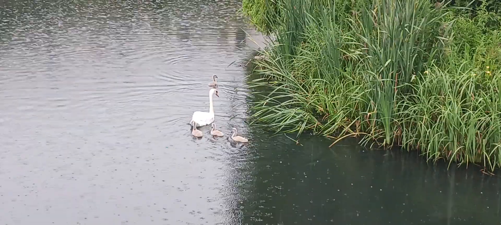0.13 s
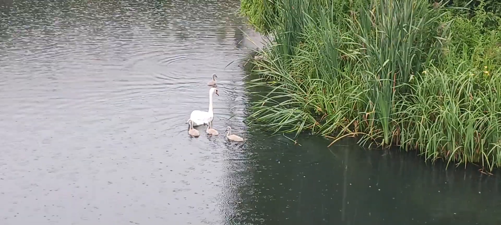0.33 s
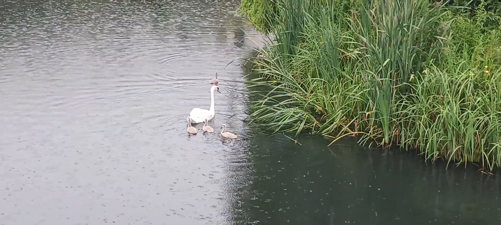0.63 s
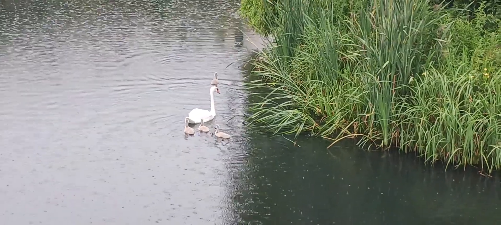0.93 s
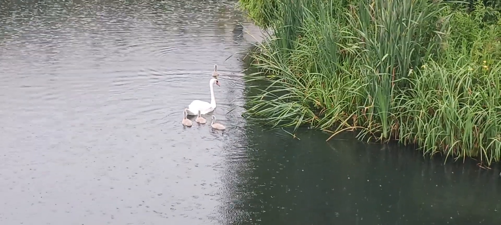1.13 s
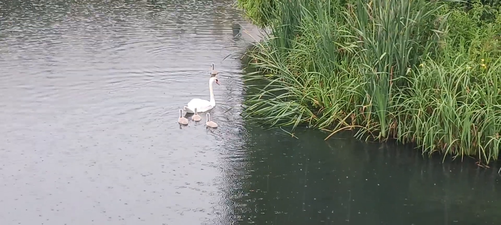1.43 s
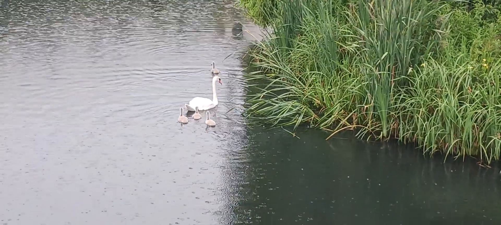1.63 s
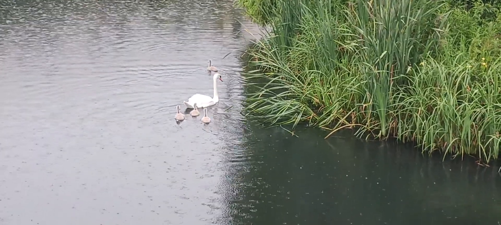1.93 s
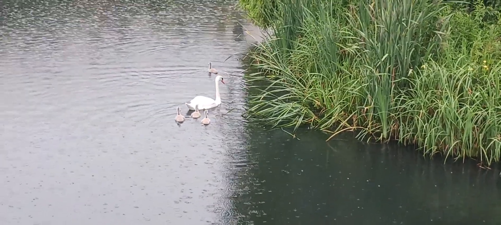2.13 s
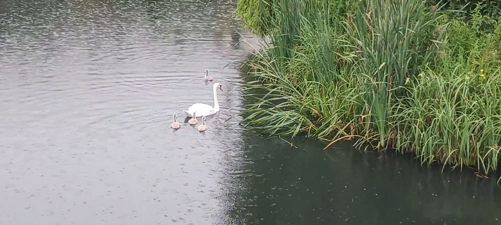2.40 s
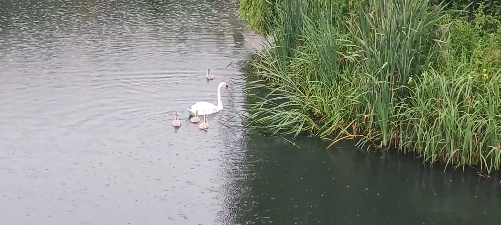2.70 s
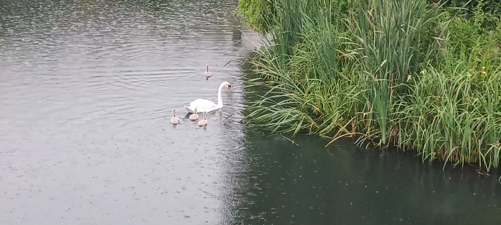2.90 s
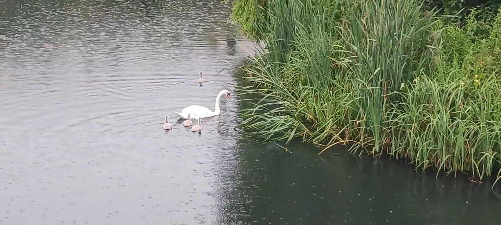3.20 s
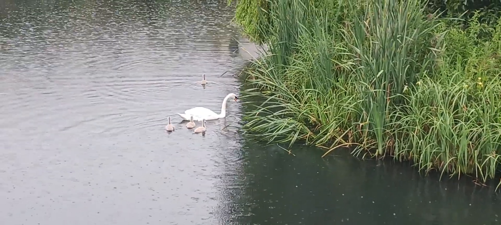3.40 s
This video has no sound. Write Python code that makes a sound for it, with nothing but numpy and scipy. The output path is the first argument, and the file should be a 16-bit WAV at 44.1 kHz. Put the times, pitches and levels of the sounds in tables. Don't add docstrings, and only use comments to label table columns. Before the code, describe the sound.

Silence for 0.1 s, then steady fine rain on a pond and reeds fades in fast and continues to 3.5 s, bright left, muffled right, over low uneven gusts and a faint distant hum. From 0.4 s single drops tick sharply, plop on water and tap leaves, mostly left. Small case knocks start around 1 s, clustering at 1.9, 2.6 and 3.3 s with finger creaks; a faint high sleeve swish passes at 2.9-3.2 s.

```python
import sys
import numpy as np
from scipy import signal
from scipy.fft import rfft, irfft
from scipy.io import wavfile
from scipy.ndimage import uniform_filter1d

SR = 44100
rng = np.random.default_rng(int(sys.argv[2]) if len(sys.argv) > 2 else 0)


def decibels_to_gain(level_db):
    exponent = np.asarray(level_db, float) / 20
    return 10 ** exponent


def transcribe(u):
    v = np.clip(np.atleast_2d(u).T, -1, 1)
    q = np.round(v * 32767).astype(np.int16)
    wavfile.write(sys.argv[1], SR, q)


N = 156555


def evened(x):
    return x / np.sqrt(np.mean(x ** 2) + 1e-20)


def read(points, hz):
    f, value = np.transpose(points)
    return np.interp(np.log(hz + 1), np.log(f + 1), value)


def along(points):
    return np.interp(np.arange(N) / SR, *np.transpose(points))


def shape(x, gain):
    return irfft(rfft(x) * gain(np.fft.rfftfreq(N, 1 / SR)), N)


def add(mix, start_s, sound):
    part = mix[:, round(start_s * SR):][:, :sound.shape[1]]
    part += sound[:, :part.shape[1]]


def port(floor, peaks):
    def gain(hz):
        power = decibels_to_gain(read(floor, hz)) ** 2
        for f, width, db in peaks:
            power = power + decibels_to_gain(db) ** 2 / (1 + ((hz - f) / width) ** 2) ** 3
        return np.sqrt(SR / 2 * power)
    return gain


def patchy(x, patchy_db, flicker_db, count=10):
    z = signal.stft(x, nperseg=256, noverlap=192)[2]
    a = rng.standard_normal(z.shape[::-1]).T
    patches = evened(uniform_filter1d(uniform_filter1d(a, 4, 0), 4 * count, 1))
    flicker = evened(uniform_filter1d(uniform_filter1d(a, 60, 0), count, 1))
    z = z * decibels_to_gain(patchy_db * patches + flicker_db * flicker)
    return evened(signal.istft(z, nperseg=256, noverlap=192)[1][:N])


def grains(per_s, spread_db, hz_low, hz_high, cycles):
    starts = rng.random(N) < per_s / SR
    size = decibels_to_gain(spread_db * np.minimum(rng.exponential(1, N), 4)) * starts
    kind, out = rng.integers(0, 24, N), np.zeros(N)
    for k, hz in enumerate(np.geomspace(hz_low, hz_high, 24)):
        turns = np.arange(0, 4 * cycles, hz / SR)
        burst = turns * np.exp(-2 * turns / cycles) * np.sin(2 * np.pi * turns) * hz ** 0.82
        out += signal.oaconvolve(size * (kind == k), burst)[:N]
    return evened(out)


def ring(db, hz, t60, splash):
    t, f = np.arange(4096) / SR, np.fft.rfftfreq(4096, 1 / SR)
    blur = 1 + ((f / hz - 1) / 0.06) ** 2
    spray = evened(irfft(rfft(rng.standard_normal(4096)) / blur))
    body = (1 - splash) * np.sin(2 * np.pi * hz * t) + splash * spray
    rise = np.minimum(t / 0.0006, 1)
    return decibels_to_gain(db - 60 * t / t60) * rise * body


# pitch_hz, level_db (per Hz)
RAIN_COLOUR = [(300, -82), (800, -91), (2300, -92), (5150, -99.), (8000, -106.5), (10100, -100.),
               (14500, -99.), (16000, -97)]
# (per Hz, at the top)
OPEN_RESONANCES = [(1335, 288, -74.5), (1643, 536, -75), (2616, 270, -79.5), (3190, 460, -77.5),
                   (3730, 570, -74), (4540, 290, -85.5), (6000, 1180, -85), (6270, 3830, -89),
                   (10800, 300, -129), (12240, 1330, -88), (14800, 1500, -99.)]
# pitch_hz, level_db (per Hz)
COVERED_COLOUR = [(300, -90.), (850, -102.), (2800, -104.), (4300, -110.), (6200, -127.), (7700, -131.),
                  (9200, -121.), (14000, -118.)]
# (per Hz, at the top)
COVERED_RESONANCES = [(1210, 160, -87), (1660, 400, -87.5), (2420, 170, -92), (3030, 130, -92),
                      (17000, 330, -110.)]
# pitch_hz, likeness (0-1)
RAIN_LIKENESS = [(300, 1), (520, 0.2), (750, 0.1), (1200, 0.6), (2000, 0.65), (3300, 0.27), (5500, 0.19)]


def rain():
    drop_share, lag_s = 0.22, 7e-5

    def field():
        hiss = np.sqrt(1 - drop_share) * rng.standard_normal(N)
        drops = np.sqrt(drop_share) * grains(2500, 1.5, 698, 18300, 1.07)
        return patchy(hiss + drops, 0.8, 0.39)

    def same(hz):
        return np.clip(read(RAIN_LIKENESS, hz), 0, 1)

    def finger(hz):
        dip = 1 - 0.7 / (1 + ((hz - 6600) / 1300) ** 4)
        return port(COVERED_COLOUR, COVERED_RESONANCES)(hz) * dip

    a, b = field(), field()
    shared = shape(a, lambda hz: same(hz) * np.exp(-2j * np.pi * hz * lag_s))
    own = shape(b, lambda hz: np.sqrt(1 - same(hz) ** 2))
    left = shape(a, port(RAIN_COLOUR, OPEN_RESONANCES))
    left = shape(left, lambda hz: 1 - 0.3 / (1 + ((hz - 5200) / 170) ** 2))
    right = shape(shared + own, finger)
    return shape(np.array([left, right]), lambda hz: np.minimum(hz / 300, 1) ** 2)


# pitch_hz, level_db (per Hz)
WIND_COLOUR = [(22, -140), (36, -69), (50, -64.5), (72, -66), (90, -72.5), (170, -77.5), (350, -87.5),
               (700, -93.5)]
# time_s, level_db
GUST_CURVE = [(.3, -58.5), (.5, -55), (.91, -59.5), (1.02, -47), (1.2, -54.5), (1.35, -55.5), (1.43, -51),
              (1.53, -56), (1.69, -46.5), (1.82, -54), (2.07, -53.5), (2.25, -54), (2.45, -50.5),
              (2.6, -46), (2.7, -66), (2.8, -49.5), (2.88, -59.), (3.1, -52.5), (3.3, -52.5)]


def wind():
    likeness, turn_rad, lumpy_db = 0.99, 0.71, 0.5
    a, b = [patchy(x, lumpy_db, lumpy_db, count=30) for x in rng.standard_normal((2, N))]
    right = likeness * shape(a, lambda hz: np.exp(-1j * turn_rad)) + np.sqrt(1 - likeness ** 2) * b

    def colour(hz):
        return port(WIND_COLOUR, [])(hz) * np.minimum(hz / 22, 1) ** 2 / (1 + (hz / 900) ** 4)

    air = shape(np.array([a, right]), colour)
    low = shape(air, lambda hz: 1 / (1 + (hz / 110) ** 4))
    gust_db = along(GUST_CURVE) + 50
    return low * decibels_to_gain(gust_db) + (air - low) * decibels_to_gain(0.16 * gust_db)


def hum():
    def waver(x):
        return evened(shape(x, lambda hz: 1 / (1 + (hz / 6) ** 2)))

    drift, swell = [waver(x) for x in rng.standard_normal((2, N))]
    pitch_hz = 565.3 + 4 * drift
    return decibels_to_gain(-65.5 + 0.5 * swell) * np.sin(2 * np.pi * np.cumsum(pitch_hz) / SR)


def large_drops(drops):
    out = np.zeros((2, N))
    sides = decibels_to_gain(np.array([[0], [-45]]))
    for start_s, db, hz, t60 in drops:
        turns = np.arange(4096) * hz / SR
        tick = decibels_to_gain(db - 8) * np.cos(2 * np.pi * turns) * np.exp(-turns / 0.44)
        add(out, start_s, (ring(db, hz, t60, 0.35) + tick) * sides)
    return out


# start_s, level_db (peak), pitch_hz, ring_s (to fall 60 dB)
PORT_DRIPS = [(.396, -28., 4100, .012), (.396, -33., 5100, .01), (.4928, -34., 13500, .006),
              (.4928, -35., 11700, .007), (.4928, -36., 15200, .005), (.5735, -27., 4250, .018),
              (.5755, -34., 5100, .015), (.819, -31., 3570, .016), (.962, -41., 6000, .2),
              (.9749, -30., 6800, .011), (.9749, -33., 7900, .022), (.9749, -37., 10500, .005),
              (.9749, -36., 12800, .006), (.9749, -39., 15000, .005), (1.011, -33., 6500, .012),
              (1.287, -29., 3600, .012), (1.574, -36., 8400, .015), (1.574, -36., 7200, .012),
              (1.7495, -28., 3650, .013), (1.915, -31., 3800, .03), (1.922, -35., 4100, .04),
              (1.926, -39., 6200, .04), (1.9255, -33., 4600, .03), (1.9285, -27., 4300, .03),
              (1.929, -37., 5200, .02), (1.932, -32., 4500, .02), (1.936, -31., 3900, .045),
              (1.938, -37., 6200, .025), (2.3255, -29., 3800, .014), (3.3262, -31., 3200, .012)]


def port_drips():
    return large_drops(PORT_DRIPS)


# start_s, level_db (peak), pitch_hz
POND_PLOPS = [(0.5629, -41, 1470), (0.62, -31, 1720), (1.0555, -34, 1760), (1.2259, -45, 1450),
              (1.442, -35, 1340), (1.611, -31.5, 1320), (1.6725, -25, 1540), (1.7224, -32, 1300),
              (1.8104, -31.5, 1600), (1.841, -34, 1430), (2.056, -41, 1240), (2.3496, -44, 1290),
              (2.5421, -41, 1290), (2.5571, -32, 1390), (2.6718, -39, 1530), (3.175, -32, 1540),
              (3.2181, -43, 1560)]


def pond_plops():
    return large_drops([(start_s, db + 1.5, hz, 0.015) for start_s, db, hz in POND_PLOPS])


# start_s, level_db (peak), pitch_hz
REED_TAPS = [(0.8059, -33, 3570), (1.0256, -35, 3800), (1.2259, -32, 3700), (1.4341, -43, 3950),
             (1.4539, -38, 3280), (1.6679, -30, 3500), (1.9534, -39, 4030), (1.9664, -31, 3780),
             (2.1191, -40, 3730), (2.282, -36, 3820), (2.4084, -37, 3360), (2.4162, -35, 3860),
             (2.5521, -31, 3850), (2.6711, -35, 3700), (2.6993, -33.5, 3580), (2.7531, -38, 3670),
             (3.2151, -42, 3600), (3.3037, -36, 3200)]


def reed_taps():
    return large_drops([(start_s, db + 4, hz, 0.018) for start_s, db, hz in REED_TAPS])


# start_s, level_db (peak), pitch_hz, ring_s (to fall 60 dB), left_over_right_db
CASE_KNOCKS = [(1.011, -38.5, 1420, 0.035, 9), (1.256, -36.5, 292, 0.017, -12),
               (1.289, -36.5, 1370, 0.01, 16), (1.753, -42, 775, 0.014, 2), (1.9165, -33.5, 360, 0.018, 1),
               (1.9335, -41, 463, 0.05, -3), (1.9356, -36, 475, 0.03, 9), (1.9382, -26, 510, 0.0072, 4),
               (1.99, -45.5, 548, 0.1, -6), (2.03, -48, 540, 0.042, 0), (2.567, -41, 1400, .015, -4),
               (2.58, -34, 1400, 0.011, -4), (2.63, -39., 1250, 0.016, -7), (2.635, -44., 536, 0.091, -3),
               (1.965, -39, 2330, .03, 1.5), (2.339, -36, 210, 0.025, -4), (2.567, -40, 454, 0.045, 5),
               (2.580, -33.5, 230, 0.04, -3), (2.592, -38, 1360, .015, -3), (2.606, -35, 1430, .015, -1.5),
               (2.618, -35.5, 1200, 0.012, 4), (2.858, -41, 1770, 0.063, 3), (2.885, -38, 2040, 0.028, 11),
               (3.177, -44., 490, 0.032, 4), (3.246, -38, 953, 0.035, 2), (3.244, -32.5, 574, 0.0084, 1.5),
               (3.3265, -33.5, 470, 0.023, 2.5), (3.3265, -33.5, 2116, 0.094, 8),
               (3.331, -39.5, 2120, 0.054, 4), (3.3265, -34, 1080, .012, 0), (3.329, -42, 1500, 0.035, -6),
               (3.361, -39.5, 463, 0.026, -4)]


def knocks():
    out, t = np.zeros((2, N)), np.arange(4096) / SR
    tick = (1 - t / 0.0002) * np.exp(-t / 0.0002)
    for start_s, db, hz, t60, pan_db in CASE_KNOCKS:
        sides = decibels_to_gain(np.array([[pan_db / 2], [-pan_db / 2]]))
        add(out, start_s, (ring(db, hz, t60, 0.11) + decibels_to_gain(db - 9) * tick) * sides)
    return np.array([out[0], shape(out[1], lambda hz: 1 / (1 + (hz / 4300) ** 8))])


# time_s, level_db
GRIP_PRESSURE = [(1.1, -80.), (1.27, -68.), (1.4, -80.), (1.68, -76.), (1.78, -65.), (1.88, -67.),
                 (1.95, -54.), (2.1, -70.), (2.4, -70.), (2.48, -58.), (2.55, -64.), (2.62, -54.),
                 (2.7, -64.), (2.88, -59.), (3.0, -74.), (3.31, -64.), (3.34, -51.), (3.39, -51.),
                 (3.43, -46.), (3.47, -48.), (3.52, -56.)]
# pitch_hz, level_db
GRIP_COLOUR = [(200, -16.), (500, -6.), (800, -15.), (1400, -.5), (2200, -1.5), (2900, -12.), (4000, -15.),
               (5800, -62.)]


def finger_creep():
    def slipping():
        slips = grains(900, 0.45, 223.3, 4190, 4.5)
        return patchy(slips + 1.5 * rng.standard_normal(N), 1.9, 1.1)

    a, b = slipping(), slipping()
    creep = evened(shape(np.array([a + 1.2 * b, a]), lambda hz: decibels_to_gain(read(GRIP_COLOUR, hz))))
    return creep * decibels_to_gain(along(GRIP_PRESSURE))


# time_s, level_db
SWISH_STROKE = [(2.89, -30.), (2.93, -12.), (2.99, -6.), (3.03, .5), (3.045, 0.), (3.055, -4.), (3.072, 1.),
                (3.095, -4.), (3.13, -9.), (3.15, -6.), (3.161, 2.5), (3.176, -3.), (3.19, -30.)]
# pitch_hz, level_db
SWISH_LEFT_COLOUR = [(7000, -20.), (8600, -9.), (9900, -15.), (10500, -3.), (11000, -9.), (12000, -2.5),
                     (13600, -12.), (15300, -4.)]
# pitch_hz, level_db
SWISH_RIGHT_COLOUR = [(8000, -60.), (9300, -13), (13500, -21), (14800, 5), (15600, -7)]
SWISH_LEVELS = [-40, -53]


def sleeve_swish():
    def brushed(db, colour):
        noise = patchy(rng.standard_normal(N), 1.6, 1.2, count=5)
        return decibels_to_gain(db) * evened(shape(noise, lambda hz: decibels_to_gain(read(colour, hz))))

    colours = (SWISH_LEFT_COLOUR, SWISH_RIGHT_COLOUR)
    swish = np.array([brushed(db, colour) for db, colour in zip(SWISH_LEVELS, colours)])
    t = np.arange(N) / SR
    touching = (t > SWISH_STROKE[0][0]) * (t < SWISH_STROKE[-1][0])
    return swish * decibels_to_gain(along(SWISH_STROKE)) * touching


def scene():
    weather = rain() + wind() + hum()
    drops = port_drips() + pond_plops() + reed_taps()
    hand = knocks() + finger_creep() + sleeve_swish()
    return weather + drops + hand


def roll_off(x):
    return signal.sosfilt(signal.butter(12, 16400, fs=SR, output="sos"), x)


# time_s, level_db
RECORDER_GAIN = [
    (.104, -53),
    (.112, -24),
    (.13, -11),
    (.17, -6.),
    (.3, -2),
    (.9, -2),
    (1.3, -0.58),
    (3.55, -0.55),
]


def record(dry):
    opened = np.arange(N) / SR > RECORDER_GAIN[0][0]
    edged = shape(dry, lambda hz: hz < 15745)
    finished = edged * decibels_to_gain(along(RECORDER_GAIN)) * opened
    return roll_off(finished)


dry = scene()
out = record(dry)
transcribe(out)
```